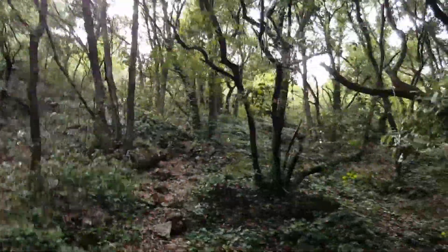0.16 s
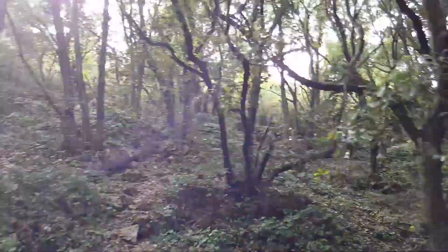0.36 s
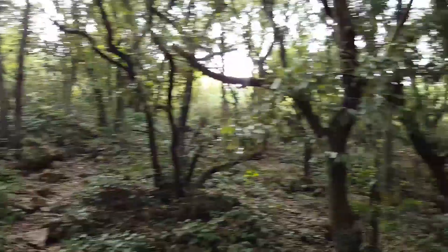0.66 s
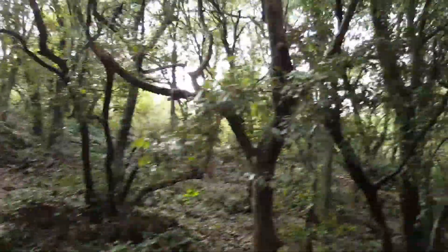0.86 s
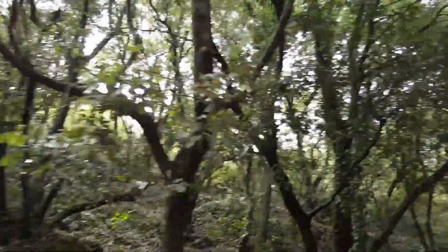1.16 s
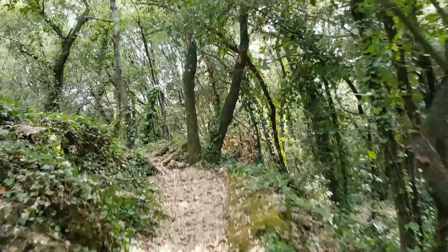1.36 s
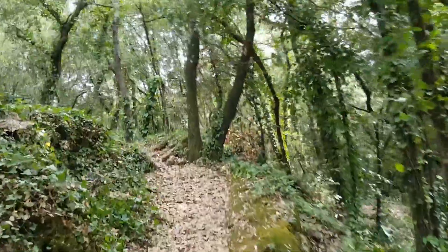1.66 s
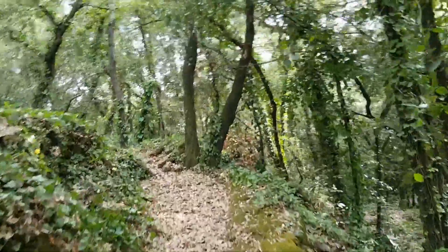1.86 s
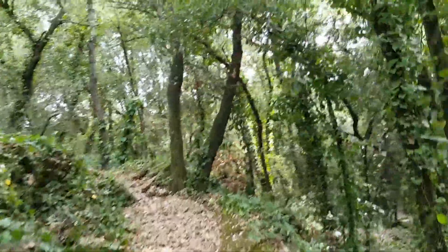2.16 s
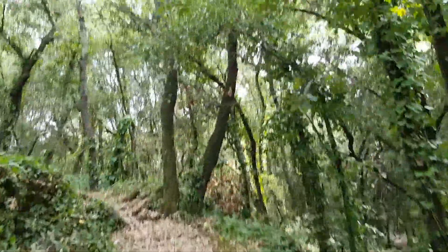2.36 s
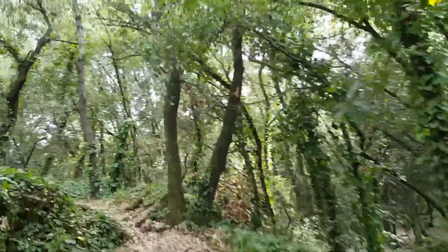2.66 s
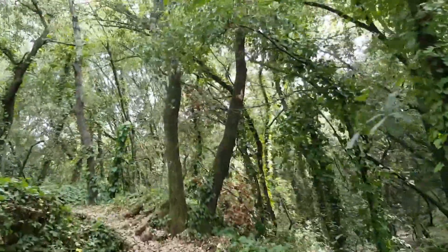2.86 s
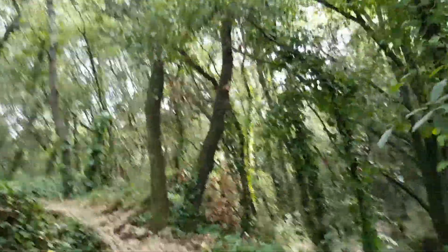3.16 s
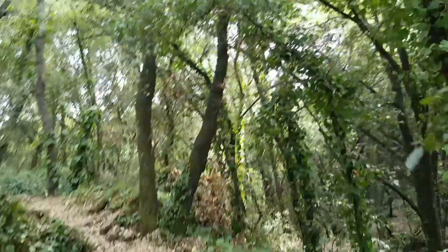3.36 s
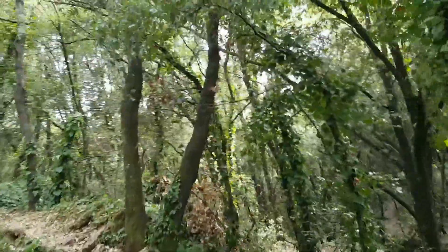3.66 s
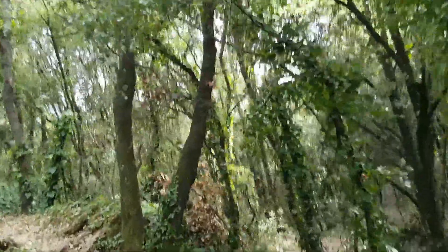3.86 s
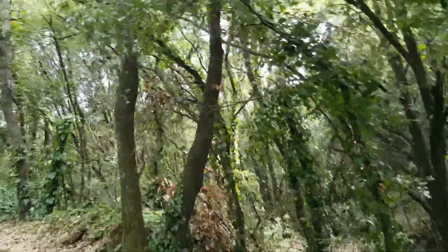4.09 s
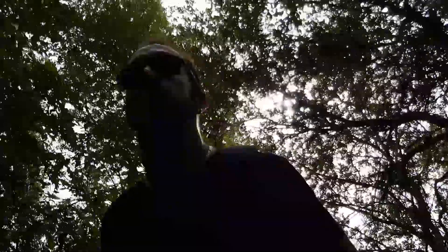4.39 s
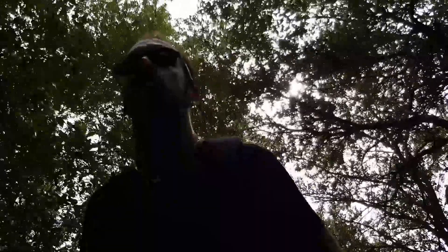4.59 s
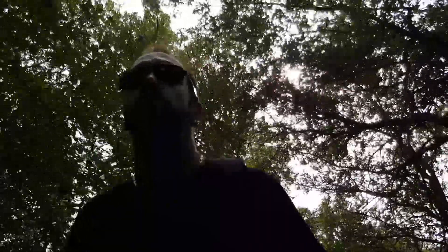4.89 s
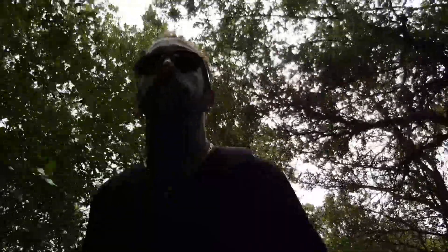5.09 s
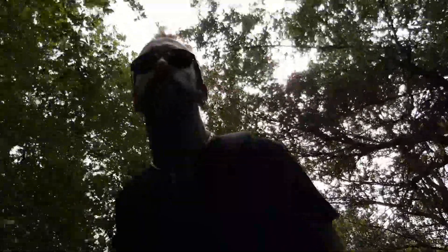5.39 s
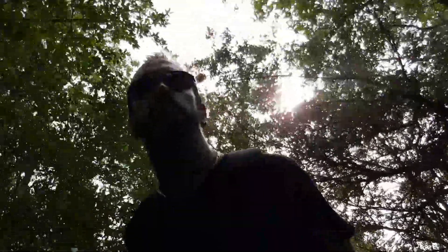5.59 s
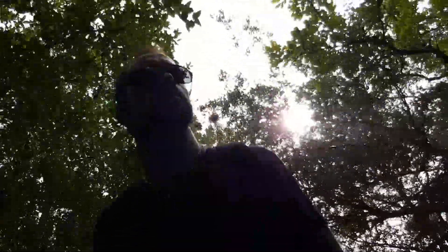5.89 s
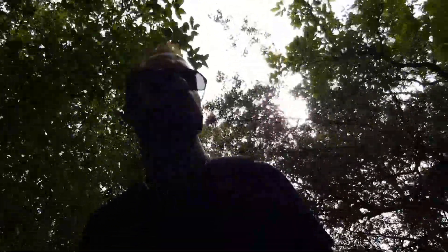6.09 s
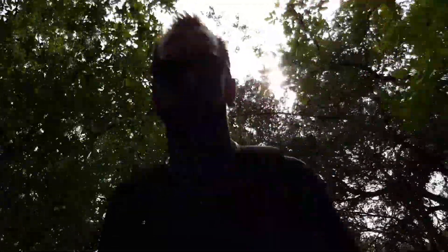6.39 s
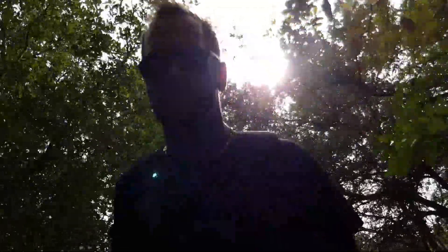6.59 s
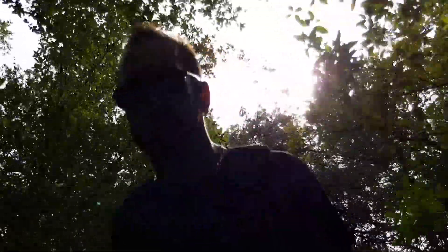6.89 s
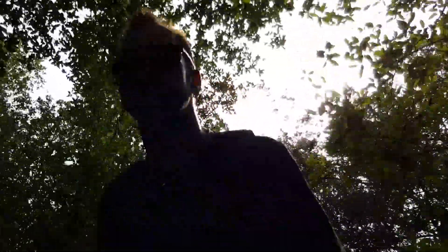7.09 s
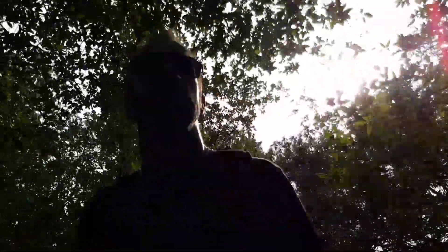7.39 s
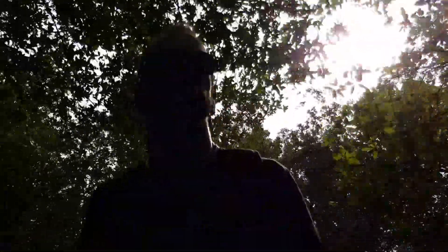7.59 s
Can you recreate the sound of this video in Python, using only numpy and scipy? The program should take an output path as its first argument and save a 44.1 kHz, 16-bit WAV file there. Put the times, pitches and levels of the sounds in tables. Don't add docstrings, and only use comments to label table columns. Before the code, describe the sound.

From 0 s the cicadas are already in full song, with no fade-in. Five close singers rasp in short bursts of roughly a tenth of a second, each made of dry clicks about a hundred times a second, ringing brightest around 4 to 6 kHz. Their paces differ, so the shrill throbs five to seven times a second, now aligned, now smeared, with softer buzzing between bursts. One loud, slower rattle sits left, another steady one right, others nearer the centre. A far chorus makes a continuous sizzling bed. For the first 2 s or so, weak low hand rumble lies underneath, then settles; very faint leaf rustle, thin motor hum and microphone hiss remain throughout. Trunks add a short, dense scatter. The stereo image feels diffuse, one side reversed in polarity. The texture stays essentially constant through about 7.5 s and stops still singing.

```python
import sys
import numpy as np
from scipy import signal
from scipy.io import wavfile
from scipy.ndimage import uniform_filter1d

SR = 44100
rng = np.random.default_rng(int(sys.argv[2]) if len(sys.argv) > 2 else 0)


def bounce(signal):
    frames = np.transpose(np.atleast_2d(signal))
    limited = np.clip(frames, -1, 1)
    pcm = np.round(limited * 32767).astype(np.int16)
    wavfile.write(sys.argv[1], SR, pcm)


def level_to_linear(level):
    exponent = np.asarray(level, float) / 20
    return 10 ** exponent


N = 341543

# middle t/s, length/s, effort/dB
BURSTS_A = [(.05, 0.13, 1), (.74, 0.079, 0.5), (1.41, 0.15, 1), (2.13, 0.092, 3), (2.85, 0.13, 0),
            (3.58, 0.096, 3), (4.31, 0.073, 3), (5.02, 0.13, 0.5), (5.74, 0.086, 2.5), (6.49, 0.13, 0),
            (7.2, 0.099, 2), (7.9, .08, 1.5)]
BURSTS_B = [(.14, 0.062, 3.5), (0.831, 0.058, 3.5), (1.51, 0.058, 1), (2.188, 0.081, 0), (2.88, 0.038, 4),
            (3.598, 0.098, 1), (4.348, 0.097, 2.5), (5.05, 0.092, 2.5), (5.74, 0.067, 2), (6.429, 0.083, 1),
            (7.131, 0.056, 2.5), (7.82, 0.061, 3)]
BURSTS_C = [(.14, 0.062, 3.5), (.7, 0.1, -1.5), (1.29, 0.078, -2), (1.858, .08, -2.5), (2.5, 0.051, 1),
            (3.11, 0.017, 4.5), (3.66, 0.072, 2.5), (4.19, .055, 2), (4.77, 0.11, -3), (5.309, 0.067, -0.5),
            (5.868, 0.084, -1), (6.418, 0.15, 1), (6.97, 0.047, -1.5), (7.52, 0.061, -1.5), (8.08, .07, 7)]
BURSTS_D = [(0, 0.089, 0.78), (0.758, 0.13, 0.26), (1.52, 0.11, 0.98), (2.281, 0.1, 1.2),
            (3.048, 0.13, 0.86), (3.808, 0.13, -0.99), (4.568, 0.099, -1), (5.33, 0.13, 1.7),
            (6.081, 0.11, -0.57), (6.81, 0.11, 2.2), (7.57, 0.099, 0.52), (8.33, 0.11, 0.58)]
BURSTS_E = [(.04, 0.049, 0), (.61, 0.078, -0.5), (1.17, 0.068, -3.5), (1.738, 0.1, -1.5), (2.33, 0.063, -1),
            (2.9, 0.065, 0), (3.49, 0.072, -0.5), (4.08, 0.032, 1.5), (4.68, 0.088, -1.5),
            (5.26, 0.095, -4.5), (5.84, 0.068, -2), (6.42, 0.081, -3), (7.02, 0.098, -5),
            (7.62, 0.075, -4.5), (8.2, .07, 18)]
SKIPPED_BURSTS = [
    [3],
    [],
    [10, 20, 24, 32, 33, 51],
    [34],
    [19, 28, 33],
]
# f/Hz, level per Hz/dB
BODY_A = [(1720, -64), (2580, -34), (3790, -49.5), (4480, -6.5), (4650, -2.5), (5000, -20.5), (5340, -0.5),
          (6030, -25.5), (6890, -13.5), (8440, -27.5), (11020, -19), (11200, -34), (12580, -32.5),
          (15500, -38)]
BODY_B = [(1720, -40), (1890, -21), (2930, -29), (3450, -43), (3790, -21), (4130, -11), (5170, -2),
          (6370, -12.5), (6890, -12.5), (7410, -9.5), (8440, -18.5), (9300, -41), (13000, -44),
          (15500, -29)]
BODY_C = [(1720, -41), (2240, -22.5), (3620, -24.5), (4310, -40), (4480, -2), (4650, -12), (4820, -7.5),
          (5510, -6.5), (6370, -23), (6720, -21.5), (7580, -13.5), (8270, -39), (8610, -59), (15500, -39)]
BODY_D = [(1720, -38), (2240, -15), (3450, -19), (3960, -30), (4310, 2), (4480, -1), (4650, -0.5),
          (5340, -6), (5680, -27), (6550, -10), (8100, -17), (8440, -23), (8610, -18), (15500, -57)]
BODY_E = [(1720, -46), (2930, -29), (3620, -49), (4820, -10), (5680, -13), (6030, -23), (6890, -11),
          (8100, -12), (8960, -25), (9300, -24), (9820, -27), (10400, -26), (12920, -38), (15500, -60)]
# cycle rate/Hz, second drum level/dB, its place in the cycle/0-1,
# unsteadiness/share of rate, noisy share/0-1, click length/s, level/dB, left over right/dB, right delay/s
SINGERS = [
    (97.7, -3, 0.4, .02, 1, 0.002, -25.5, 2.5, .00001),
    (83.2, -5, .5, .025, 0.61, 0.0039, -23, 7.5, .000005),
    (110.4, -2.5, .5, .035, 1, 0.0026, -25, 1, -.00001),
    (105, -4.5, .5, .006, 0.83, 0.0042, -24.5, -5.5, -.000015),
    (107.7, -3.5, 0.5, 0.013, 0.83, 0.0015, -27.5, 5, -.000005),
]
# f/Hz, level per Hz/dB
FAR_CHORUS = [(1720, -35.5), (2410, -23.5), (3620, -29.5), (4820, -8.5), (5860, -13), (6200, -26),
              (6370, -17), (6890, -23), (7060, -10.5), (7410, -39), (7750, -26.5), (8610, -19.5),
              (9130, -28.5), (15500, -54.5)]
# f/Hz, level/dB
CICADA_COLOUR = [(1750, 1), (2150, 3.5), (2500, -1.5), (3250, .8), (3700, -4), (3960, 1.2), (5500, -1.3),
                 (6400, 2.5), (8600, 1.5), (10720, -6), (10950, -3.5), (11850, -6), (12580, 3), (13600, -6)]
# f/Hz, level per Hz/dB
LEAVES = [(60, -30), (150, -21), (290, -13), (560, 0), (770, -1.5), (1300, -6), (1750, -9), (2300, -30),
          (3600, -90)]
# order/1, left level/dB, right level/dB
MOTOR_ORDERS = [
    (1, -80, -81),
    (2, -83, -84),
    (8, -59.5, -78),
]
# f/Hz, level per Hz/dB
RUMBLE = [(12, -14), (20, 18), (32, -13.5), (140, -10.5), (188, -22), (241, -10), (260, -32), (340, -37),
          (570, -120)]
# f/Hz, level per Hz/dB
HISS = [(6000, -17), (11000, 12), (13500, 4), (16000, 5)]
# f/Hz, level/dB
WIDTH = [(100, 5), (300, -3.5), (700, -1.5), (1400, -8), (1900, -10.5), (2200, -1.5), (4500, 0), (7000, -5),
         (8700, -8.5), (9350, 1.5), (10000, -4), (11000, 1), (13500, -1.5), (15500, -6)]

BODY_FLOOR = (1550, -80)


def evened(x):
    return x / np.sqrt(np.mean(x ** 2) + 1e-20)


def read(points, hz):
    f, db = np.transpose(points)
    return np.interp(np.log(hz + 1), np.log(f + 1), db)


def taps(points):
    log_gain = read(points, abs(np.fft.fftfreq(4096, 1 / SR))) * np.log(10) / 20
    log_gain = uniform_filter1d(log_gain, size=5, mode="wrap")
    spectrum = np.exp(np.conj(signal.hilbert(log_gain)))
    return np.fft.ifft(spectrum).real[:2048]


def colour(x, points):
    return signal.oaconvolve(x, taps(points))[:N]


def drift(seconds):
    step = 64
    b, a = signal.butter(1, 1 / seconds, fs=SR / step)
    slow = signal.filtfilt(b, a, rng.standard_normal(N // step + 2))
    return np.interp(np.arange(N) / step, np.arange(len(slow)), evened(slow))


def wash(points, same, patchy_db):
    common, own = rng.standard_normal((2, N))
    pair = [common, same * common + np.sqrt(1 - same ** 2) * own]
    coloured = np.array([colour(side, points) for side in pair])
    return evened(coloured) * level_to_linear(patchy_db * drift(0.12))


def song(rows, skipped):
    bursts_per_row = 4
    number = np.setdiff1d(np.arange(bursts_per_row * (len(rows) - 1) + 1), skipped)
    place = number / bursts_per_row
    middle, length, db = (np.interp(place, np.arange(len(rows)), c) for c in np.transpose(rows))
    return np.transpose([middle - length / 2, length, db])


def effort(bursts, rise_s=0.033, fall_s=0.024, idle_db=-11):
    step = 32
    t = np.arange(0, N + step, step)[:, None] / SR
    start, length, db = np.transpose(bursts)
    up = np.clip((t - start) / rise_s + .5, 0, 1)
    down = np.clip((start + length - t) / fall_s + .5, 0, 1)
    power = level_to_linear(idle_db) ** 2 + (level_to_linear(db) ** 2 * up * down).sum(1)
    return np.interp(np.arange(N) / SR, t[:, 0], np.sqrt(power))


def drum(turns, cycles_hz, click_s):
    count = np.floor(turns)
    snaps = np.diff(count, prepend=count[0])
    ribs = np.exp(-(turns - count) / (cycles_hz * click_s))
    return snaps, ribs


def trunks(pan_db, delay_s):
    echo_db, echo_t60_s = -8, 0.19
    t = np.arange(SR // 3) / SR
    tail = rng.standard_normal((2, len(t))) * level_to_linear(-60 * t / echo_t60_s) * np.clip(t / 0.0018, 0, 1)
    arrival = np.array([[0], [delay_s]]) + 32 / SR
    direct = np.sinc((t - arrival) * SR) * level_to_linear(np.array([[pan_db], [-pan_db]]) / 2)
    return direct + level_to_linear(echo_db) * tail / np.linalg.norm(tail, axis=1, keepdims=True)


def cicada(bursts, body, cycles_hz, second_db, place, unsteady, noisy, click_s, db, pan_db, delay_s):
    turns = np.cumsum(cycles_hz * (1 + unsteady * drift(.06))) / SR
    first_snaps, first_ribs = drum(turns, cycles_hz, click_s)
    second_snaps, second_ribs = drum(turns - place, cycles_hz, click_s)
    snaps = first_snaps + level_to_linear(second_db) * second_snaps
    ribs = first_ribs + level_to_linear(second_db) * second_ribs
    rattle = evened(ribs * rng.standard_normal(N))
    drive = np.sqrt(1 - noisy) * evened(snaps) + np.sqrt(noisy) * rattle
    voice = taps([BODY_FLOOR] + body)
    path = signal.fftconvolve(trunks(pan_db, delay_s), voice[None], axes=1)
    heard = signal.fftconvolve((drive * effort(bursts))[None], path, axes=1)[:, :N]
    return level_to_linear(db) * evened(heard)


def near_singers():
    scores = BURSTS_A, BURSTS_B, BURSTS_C, BURSTS_D, BURSTS_E
    bodies = BODY_A, BODY_B, BODY_C, BODY_D, BODY_E
    singers = zip(scores, SKIPPED_BURSTS, bodies, SINGERS)
    return sum(cicada(song(rows, skipped), body, *drums) for rows, skipped, body, drums in singers)


def far_chorus():
    return level_to_linear(-25) * wash([BODY_FLOOR] + FAR_CHORUS, 0.7, 0.67)


def leaves():
    return level_to_linear(-44.5) * wash(LEAVES, 0.94, 1.0)


def motor_hum():
    turns = np.cumsum(93.7 + 0.256 * drift(0.24)) / SR
    hum = np.zeros((2, N))
    for order, left_db, right_db in MOTOR_ORDERS:
        level = np.sqrt(2) * level_to_linear([left_db, right_db])[:, None]
        hum += level * np.sin(2 * np.pi * order * turns)
    return hum


def hand():
    grip_db, settle_db, settle_s = -79, 8, 2
    shift_db, shift_s = 3, .1
    settling = settle_db * np.exp(-np.arange(N) / SR / settle_s)
    return level_to_linear(grip_db + settling + shift_db * drift(shift_s)) * wash(RUMBLE, 0.65, 1.4)


def hiss():
    return level_to_linear(-50) * wash(HISS, 0.98, .3)


def scene():
    cicadas = near_singers() + far_chorus()
    coloured_cicadas = np.array([colour(side, CICADA_COLOUR) for side in cicadas])
    return coloured_cicadas + leaves() + motor_hum() + hand() + hiss()


def band_limit(x):
    return signal.sosfilt(signal.butter(12, 15740, fs=SR, output="sos"), x)


def record(dry):
    ceiling, offset, offset_s = 1, .00105, 2.3
    both = dry.mean(0)
    apart = colour(dry[0] - dry[1], WIDTH) / 2
    wired = np.array([both + apart, apart - both])
    rounded = ceiling * np.tanh(wired / ceiling)
    draining = offset * np.exp(-np.arange(N) / SR / offset_s)
    return band_limit(rounded + draining)


dry = scene()
out = record(dry)
bounce(out)
```